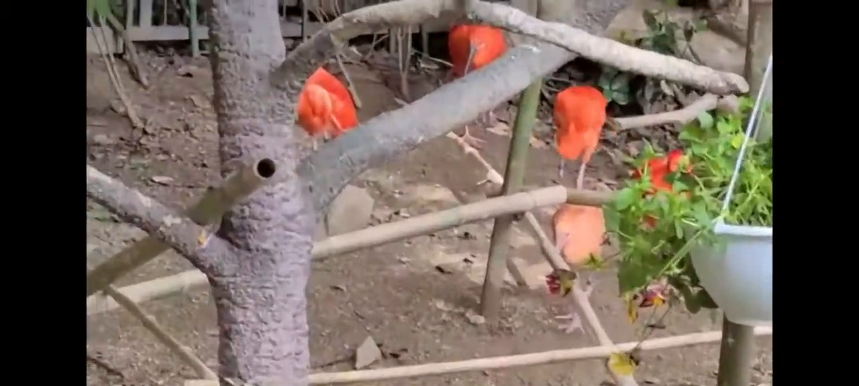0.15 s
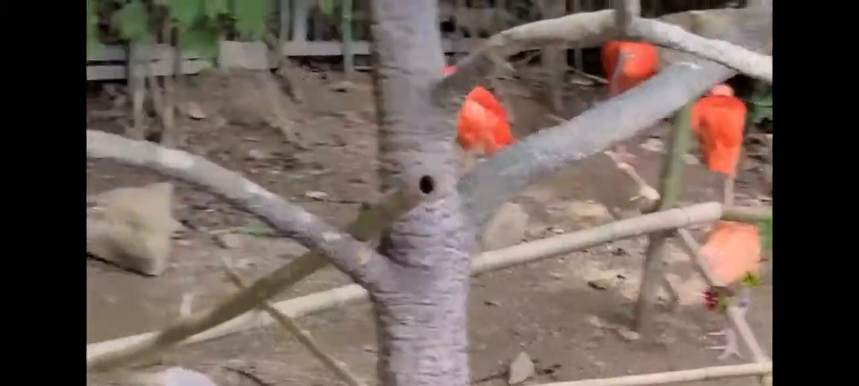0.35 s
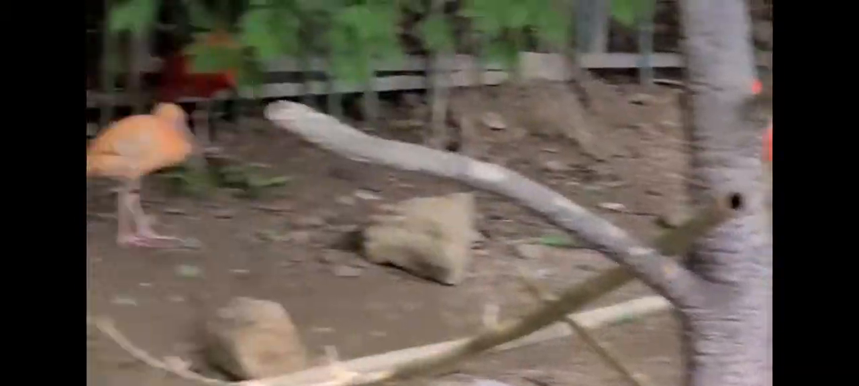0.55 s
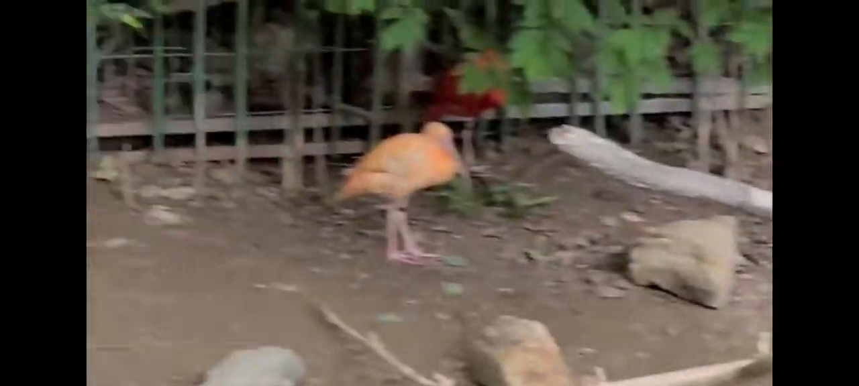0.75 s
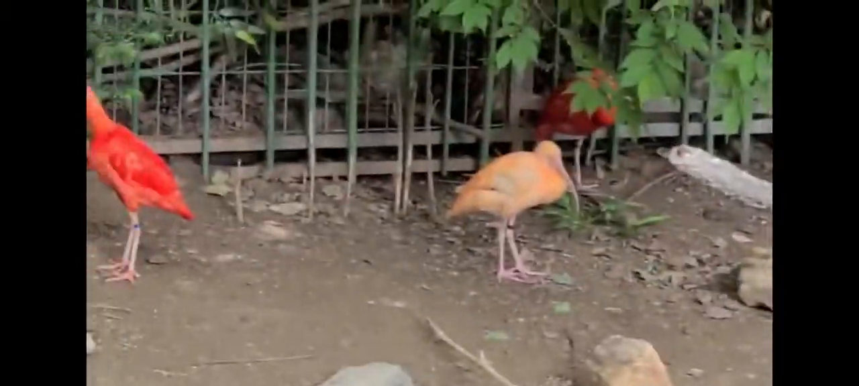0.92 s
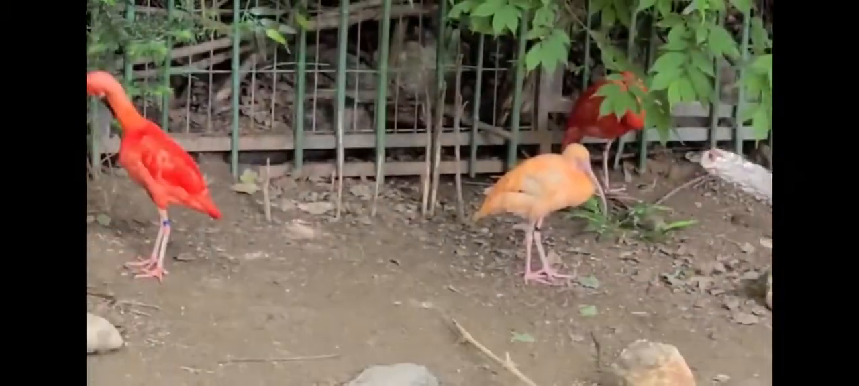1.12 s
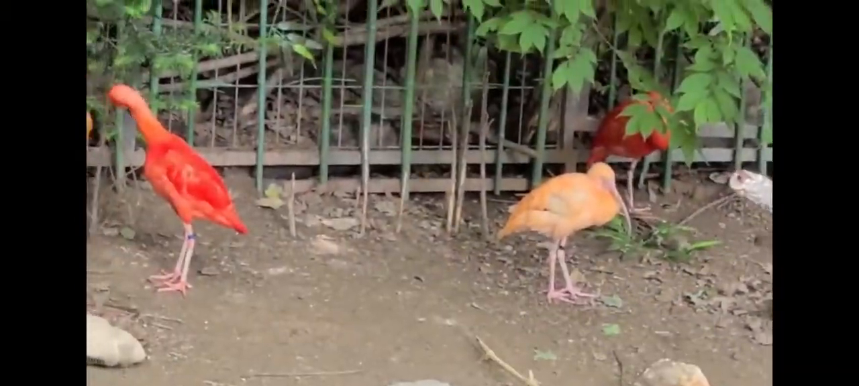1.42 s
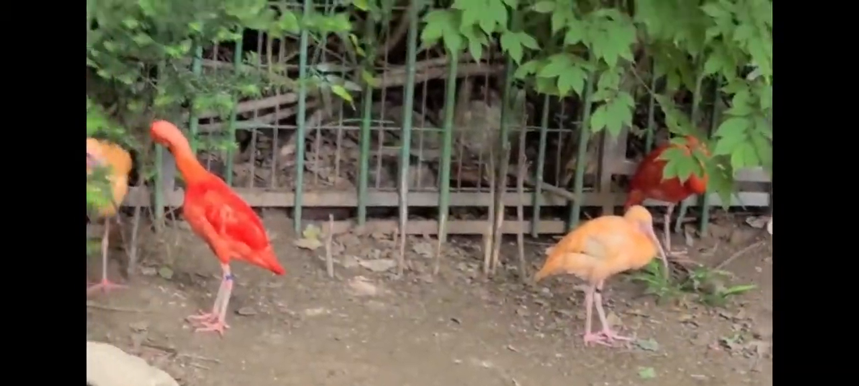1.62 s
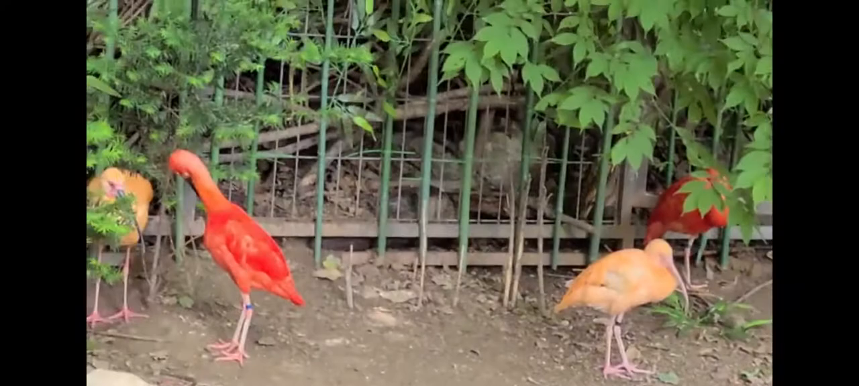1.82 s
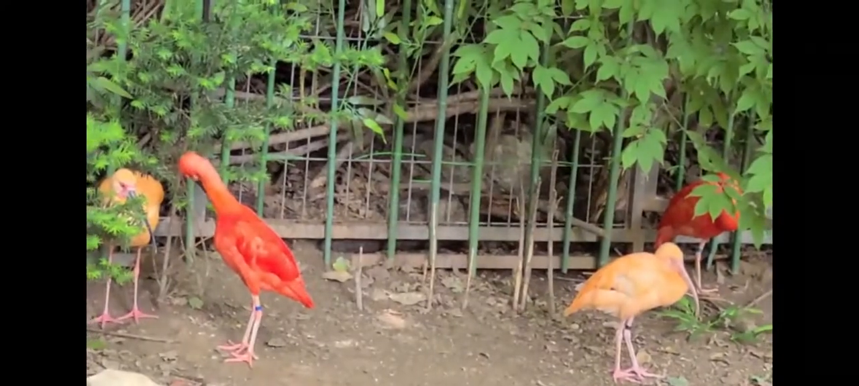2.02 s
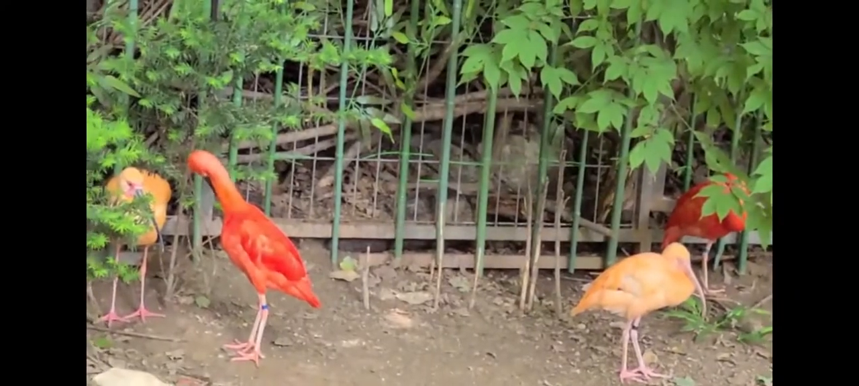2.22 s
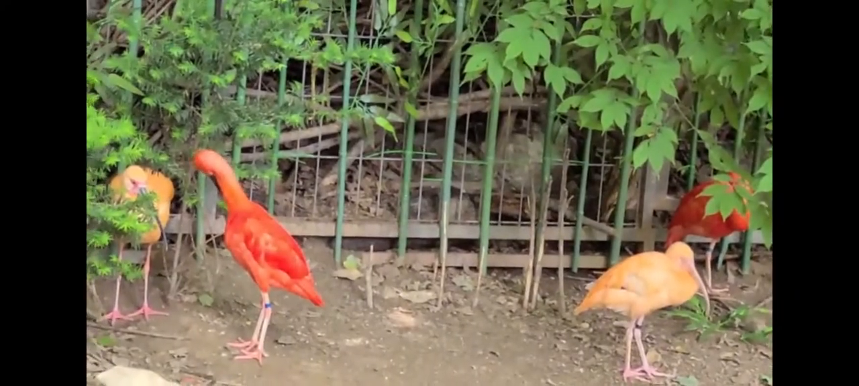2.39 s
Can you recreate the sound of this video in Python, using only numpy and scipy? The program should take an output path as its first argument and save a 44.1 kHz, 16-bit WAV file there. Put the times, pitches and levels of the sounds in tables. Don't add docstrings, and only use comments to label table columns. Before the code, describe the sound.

A flock of wading birds croaks, rasps and barks in quick overlapping calls from start to end, with one brief feather shake late, over steady water hiss and faint traffic rumble, in stereo outdoors.

```python
import sys
import numpy as np
from scipy import signal
from scipy.fft import rfft, irfft, next_fast_len
from scipy.io import wavfile
from scipy.ndimage import uniform_filter1d, map_coordinates

SR = 44100
rng = np.random.default_rng(int(sys.argv[2]) if len(sys.argv) > 2 else 0)


def unload_wav(signal):
    wavfile.write(
        sys.argv[1],
        SR,
        np.round(np.clip(np.atleast_2d(signal).T, -1, 1) * 32767).astype(np.int16),
    )


def boost_factor(decibels):
    exponent = np.asarray(decibels, float) / 20
    return 10 ** exponent


N = 112454


def unit(x):
    return x / np.sqrt(np.mean(np.abs(x) ** 2) + 1e-20)


def along(points, hz):
    f, v = np.transpose(points)
    return np.interp(np.log(hz + 1), np.log(f + 1), v, left=v[0], right=v[-1])


def wobble(rate_hz, size):
    knots = rng.standard_normal(int(size * rate_hz / SR) + 4)
    return map_coordinates(knots, [np.arange(size) * rate_hz / SR])


def filtered(x, response):
    m = next_fast_len(x.shape[-1] + 4096)
    spectrum = rfft(x, m) * response(np.fft.rfftfreq(m, 1 / SR))
    return irfft(spectrum, m)[..., :x.shape[-1]]


def add(track, start_s, sound):
    track[:, round(start_s * SR):][:, :sound.shape[1]] += sound


def throat_response(throat, tone_hz):
    tracking, fixed = throat
    peaks = [(multiple * tone_hz, width, db) for multiple, width, db in tracking] + fixed

    def ring(hz):
        total = 0
        for k, (center, width, db) in enumerate(peaks):
            damping = 1j * hz * width
            total = total + (-1) ** k * boost_factor(db) * (damping / (center ** 2 - hz ** 2 + damping)) ** 2
        return total
    return ring


# f/Hz, level/dB
SCATTER_CURVE = [(700, -6), (1300, -6.5), (2500, -5), (6000, -4)]


def scatter_paths(t):
    paths = rng.standard_normal((2, 1500)) * (rng.random((2, 1500)) < 0.06)
    paths = paths * np.exp(-t[:1500] / 0.015)
    paths = paths / np.linalg.norm(paths, axis=1, keepdims=True)
    paths = filtered(paths, lambda hz: boost_factor(along(SCATTER_CURVE, hz)))
    paths[:, 0] += 1
    return paths


# f/Hz, level/dB
HISS_CURVE = [(2500, -38), (4500, 3), (7000, 1.5), (8400, -3), (10500, 1), (13500, 3), (15600, -10)]


def call(length_s, rate_hz, tone_hz, throat, hiss_db, arch, rough, attack_s, release_s, puff_s, lag_s):
    t = np.arange(int(0.4 * SR)) / SR
    size = len(t)
    bend = 1 + arch * (np.sin(np.pi * np.clip(t / length_s, 0, 1)) - 0.6) + 0.008 * wobble(19.57, size)
    jitter = 1 + 0.1 * rough * wobble(90, size)
    cycles = np.cumsum(rate_hz * bend * jitter) / SR + 0.7
    pulses = np.append(0, np.diff(np.floor(cycles)))
    swell = np.clip(t / attack_s, 0, 1) * np.clip((length_s - t) / release_s, 0, 1)
    gate = pulses * swell * boost_factor(1.4 * rough * wobble(117, size))

    phase = 2 * np.pi * np.cumsum(tone_hz * bend) / SR + rough * wobble(111.2, size)
    ring = throat_response(throat, tone_hz)
    tone = filtered(gate * np.cos(phase), ring)
    tone = tone + filtered(gate * np.sin(phase), lambda hz: 1j * ring(hz))

    puff = t[:600] * np.exp(-t[:600] / puff_s)
    puffs = signal.fftconvolve(gate, puff)[:size] * rng.standard_normal((3, size))
    breath = filtered(puffs[0], lambda hz: ring(hz) * (hz / 1000) ** 0.25)
    breath_share = 0.5 * rough
    body = unit(tone) * np.sqrt(1 - breath_share) + unit(breath) * np.sqrt(breath_share)
    hiss = filtered(puffs[1:] + 0.43 * puffs[0], lambda hz: boost_factor(along(HISS_CURVE, hz)))

    delays_s = np.array([[0.00032 + lag_s], [0.0003]])
    ports = filtered(body, lambda hz: np.exp(-2j * np.pi * hz * delays_s))
    scattered = signal.fftconvolve(ports, scatter_paths(t), axes=1)[:, :size]
    return (scattered + boost_factor(hiss_db) * unit(hiss)) * np.sqrt(length_s / t[-1])


# (f/Hz, width/Hz, level/dB)
CROAK_RESONANCES = [(1.005, 200, 0), (1.3, 300, -21)], [(815, 130, -3), (1750, 400, -21), (2050, 300, -14),
                    (2330, 330, -8), (3300, 800, -26)]
SLOW_CROAK_RESONANCES = [(1.005, 200, 0), (1.35, 350, -14)], [(815, 130, -2), (1950, 300, -11),
                         (2350, 480, -4), (3300, 800, -24)]
# t/s, length/s, level/dB, pulse rate/Hz, tone f/Hz
CROAK_CALLS = [(0.157, 0.108, -17, 115, 1044), (0.262, .12, -18, 122, 950), (0.339, .16, -14.5, 114, 1060),
               (.505, 0.17, -15.5, 116.4, 1051), (0.633, 0.044, -18.5, 117, 897),
               (0.896, 0.085, -25.5, 130, 974), (0.971, 0.12, -21.5, 111, 930),
               (1.211, 0.115, -20, 88, 947.4), (1.307, .11, -19.5, 95, 924.4),
               (1.527, 0.12, -18, 113.5, 917), (1.661, 0.091, -25, 124, 920), (2.149, 0.13, -19, 115, 945),
               (2.26, 0.12, -17, 112, 958.5), (2.325, 0.15, -16, 117, 1035),
               (2.466, 0.147, -19.5, 111, 958)]


def croaks(track):
    for start_s, length_s, level_db, rate_hz, tone_hz in CROAK_CALLS:
        throat = CROAK_RESONANCES if rate_hz > 110.5 else SLOW_CROAK_RESONANCES
        sound = call(length_s, rate_hz, tone_hz, throat, hiss_db=-21.5, arch=0.042, rough=0.28,
                     attack_s=0.022, release_s=0.026, puff_s=0.0035, lag_s=0.00011)
        add(track, start_s, boost_factor(level_db) * sound)


# (f/Hz, width/Hz, level/dB)
RASP_RESONANCES = [(.8, 268, 2.5), (1.01, 324, 1.5)], [(872, 53, 5.5), (1670, 130, -12.5), (2720, 940, -16),
                   (4000, 1040, -20.5)]
# t/s, length/s, level/dB, pulse rate/Hz, tone f/Hz
RASP_CALLS = [(0, .1, -18, 106, 1342), (.24, 0.15, -18.5, 111, 1324), (.39, 0.12, -23.5, 170, 1396),
              (0.679, 0.11, -21.5, 126, 1330), (.93, .13, -24.5, 110, 1347), (1.331, .13, -22.5, 97, 1359),
              (1.634, 0.142, -21, 110, 1380), (1.871, .15, -22.5, 106, 1391), (2.033, 0.1, -21, 112, 1298),
              (2.277, 0.092, -20.5, 127, 1400), (1.9, 0.094, -24, 108, 1026)]


def rasps(track):
    for start_s, length_s, level_db, rate_hz, tone_hz in RASP_CALLS:
        sound = call(length_s, rate_hz, tone_hz, RASP_RESONANCES, hiss_db=-24, arch=0.016, rough=0.79,
                     attack_s=0.01, release_s=0.042, puff_s=0.0036, lag_s=-0.000048)
        add(track, start_s, boost_factor(level_db) * sound)


# (f/Hz, width/Hz, level/dB)
BARK_RESONANCES = [(1.01, 190, 0), (1.22, 300, -8)], [(2330, 400, -14), (2900, 500, -19), (3600, 600, -19),
                   (4800, 400, -17), (5850, 400, -19)]
SECOND_BIRD_RESONANCES = [(1.01, 190, 0), (1.22, 300, -7)], [(2380, 240, -5), (2720, 350, -11),
                          (3950, 550, -14), (5200, 500, -19), (6400, 500, -22)]
# t/s, length/s, level/dB, tone f/Hz, hiss level/dB
BARK_CALLS = [(.025, 0.058, -21, 1092, -13), (.015, .085, -22.5, 830, -30),
              (0.168, 0.066, -16.5, 1060, -16.5), (.405, 0.053, -17.5, 1061, -15),
              (.462, 0.047, -21.5, 1081, -7), (0.687, 0.053, -21, 1083, -7), (0.867, 0.062, -21, 1094, -12),
              (1.106, 0.068, -16.5, 1091, -15.5), (1.357, 0.048, -17, 1083, -19),
              (1.414, 0.057, -19, 1097, -18), (1.648, 0.051, -18, 1120, -19),
              (1.973, 0.047, -20, 1081, -15.5), (2.198, 0.058, -17.5, 1100, -16)]


def barks(track):
    for start_s, length_s, level_db, tone_hz, hiss_db in BARK_CALLS:
        throat = SECOND_BIRD_RESONANCES if 1 < start_s < 1.8 else BARK_RESONANCES
        sound = call(length_s, 124, tone_hz, throat, hiss_db, arch=0.019, rough=0.5,
                     attack_s=0.012, release_s=0.019, puff_s=0.0017, lag_s=-0.000057)
        add(track, start_s, boost_factor(level_db) * sound)


def flock():
    track = np.zeros((2, N + SR))
    croaks(track)
    rasps(track)
    barks(track)
    return boost_factor(-1) * track[:, :N]


# f/Hz, correlation
PORT_LIKENESS = [(60, 0.95), (130, 0.99), (290, 0.8), (640, 0.071), (15000, 0.0089)]


def rush(spectrum, patchy_db):
    z = signal.stft(rng.standard_normal((2, N)), nperseg=512)[2]
    field = uniform_filter1d(rng.standard_normal(z.shape[1:]), 6, 0)
    field = uniform_filter1d(field, 10, 1)
    pair = signal.istft(z * boost_factor(patchy_db * unit(field)), nperseg=512)[1][:, :N]

    def mid_side(hz):
        angle = np.arccos(np.clip(along(PORT_LIKENESS, hz), -1, 1)) / 2
        return boost_factor(along(spectrum, hz)) * [np.cos(angle), np.sin(angle)]
    mid, side = filtered(pair, mid_side)
    return unit(np.array([mid + side, mid - side]))


# f/Hz, level/(dB per Hz)
FEATHER_SPECTRUM = [(3000, -16), (4500, 13.5), (5400, -9), (6500, 4), (10000, -3.5), (11500, -18),
                    (15000, -22)]


def flap():
    start_s, length_s, level_db = 2.298, 0.17, -28
    progress = np.clip((np.arange(N) / SR - start_s) / length_s, 0, 1)
    swell = np.sin(np.pi * progress) ** 0.43
    return boost_factor(level_db + 2.4 * wobble(200, N)) * swell * rush(FEATHER_SPECTRUM, patchy_db=2.5)


# f/Hz, t60/s
YARD_T60 = [(500, 0.86), (2000, 0.4), (10000, 0.42)]


def yard(x):
    hz, t, z = signal.stft(rng.standard_normal((2, SR // 3)), SR, nperseg=256)
    decay = boost_factor(-60 * t / along(YARD_T60, hz)[:, None])
    tail = signal.istft(z * decay, SR, nperseg=256)[1]
    return signal.fftconvolve(x, tail / np.linalg.norm(tail[0]), axes=1)[:, :N]


# f/Hz, level/(dB per Hz)
WATER_SPECTRUM = [(150, -14), (260, -6.5), (420, 0), (700, -2.5), (1500, 0), (3500, -4.5), (8500, -17),
                  (15600, -25)]


def water():
    return boost_factor(-27 + 1.54 * wobble(2.43, N)) * rush(WATER_SPECTRUM, patchy_db=1.1)


# f/Hz, level/(dB per Hz)
TRAFFIC_SPECTRUM = [(15, -41), (25, -16), (64, 2.5), (81, 5), (145, -6.5), (188, -2.5), (231, -13.5),
                    (300, -11.5), (390, -42), (660, -120)]


def traffic():
    return boost_factor(-34.5 + 0.68 * wobble(4.23, N)) * rush(TRAFFIC_SPECTRUM, patchy_db=1.6)


def scene():
    birds = flock() + flap()
    return birds + boost_factor(-13) * yard(birds) + water() + traffic()


def roll_off(x):
    return signal.sosfilt(signal.butter(12, 15720, fs=SR, output="sos"), x)


def record(dry):
    top_hz = 15780
    mix = filtered(dry, lambda hz: hz < top_hz)
    return roll_off(mix)


dry = scene()
out = record(dry)
unload_wav(out)
```